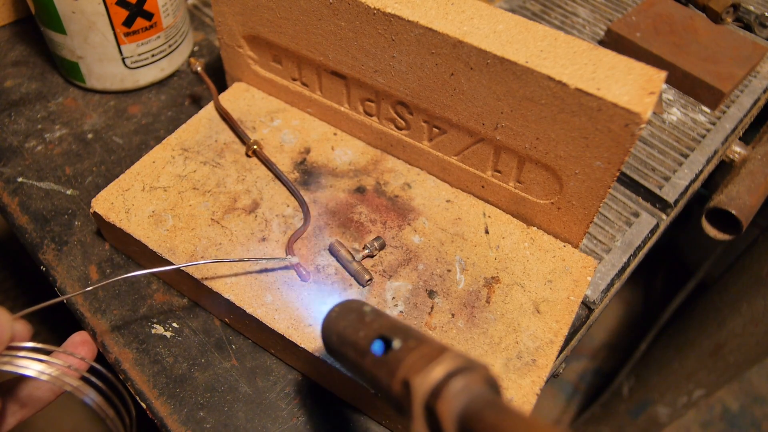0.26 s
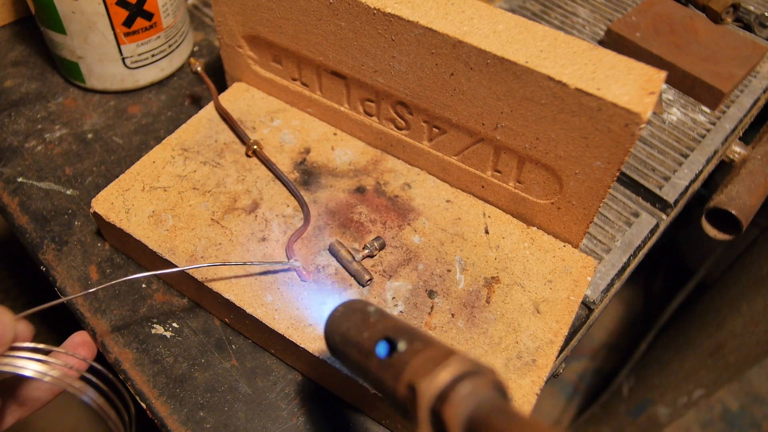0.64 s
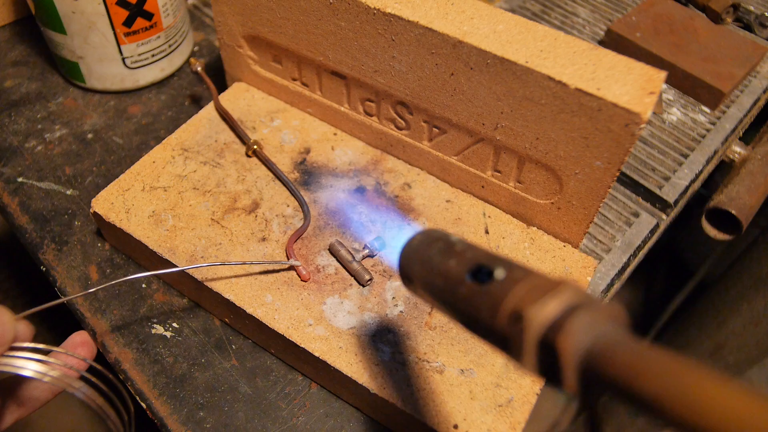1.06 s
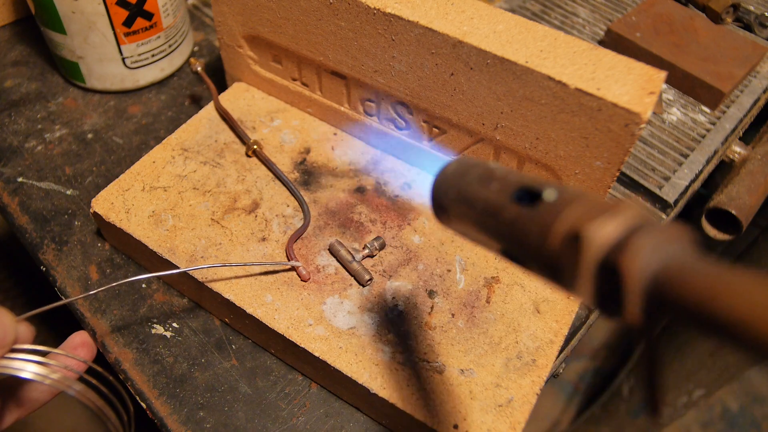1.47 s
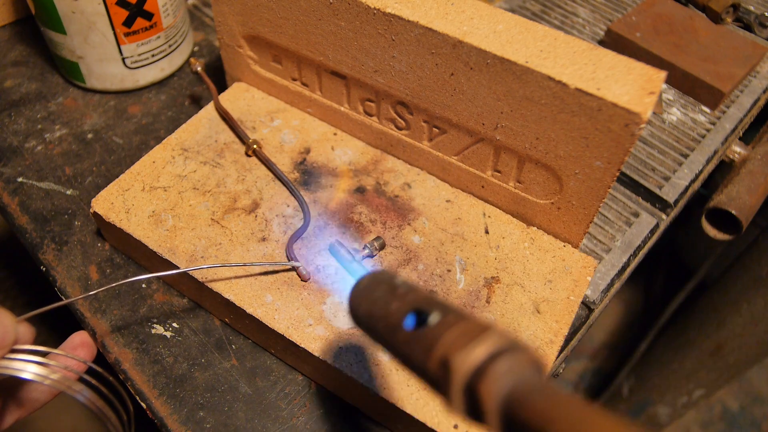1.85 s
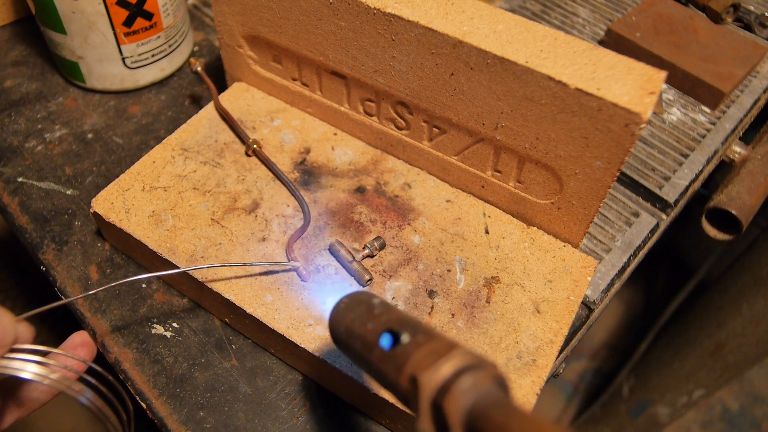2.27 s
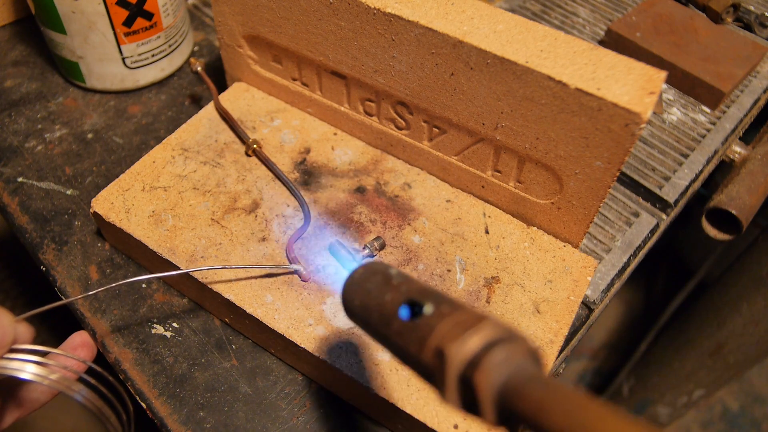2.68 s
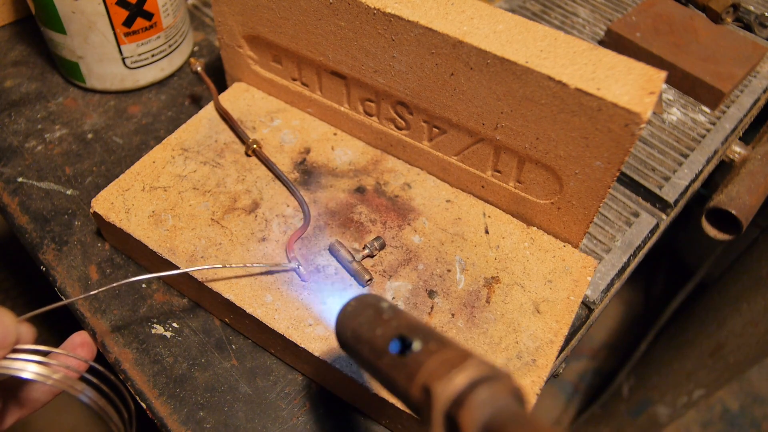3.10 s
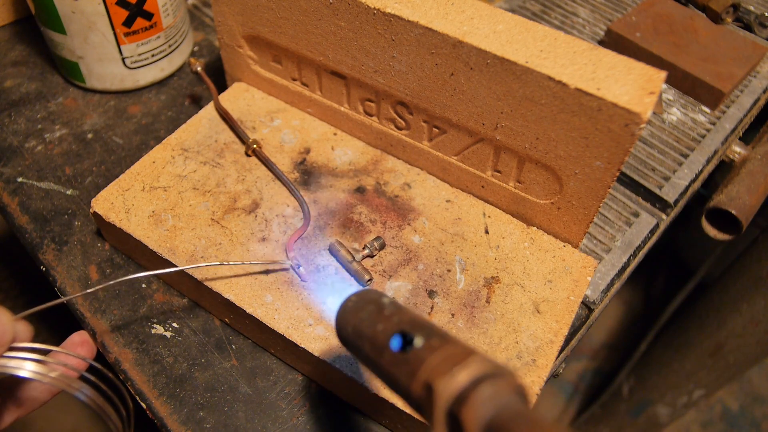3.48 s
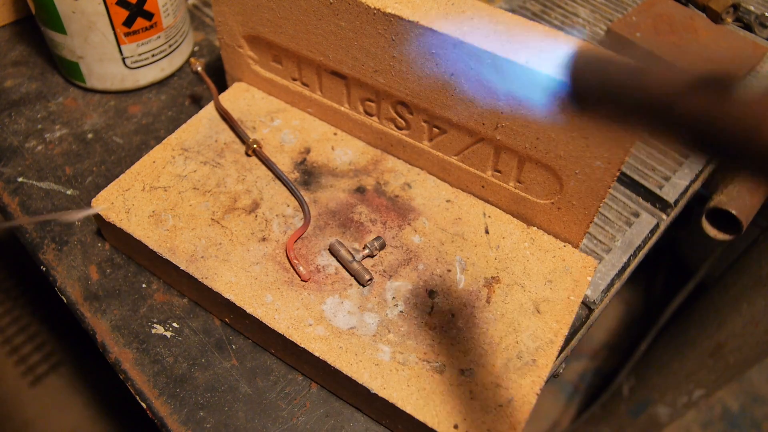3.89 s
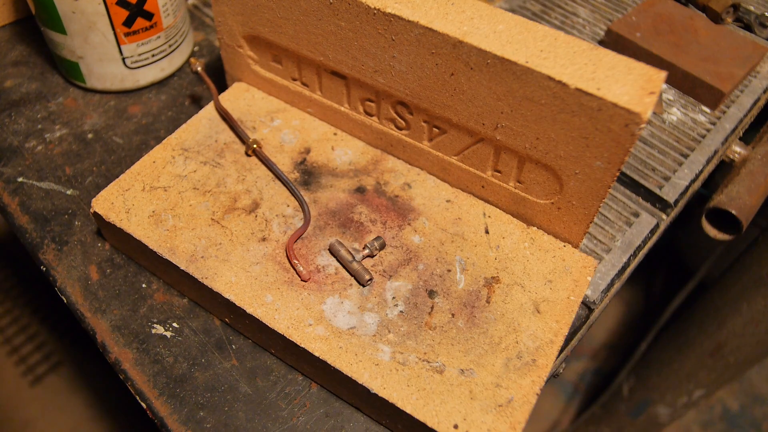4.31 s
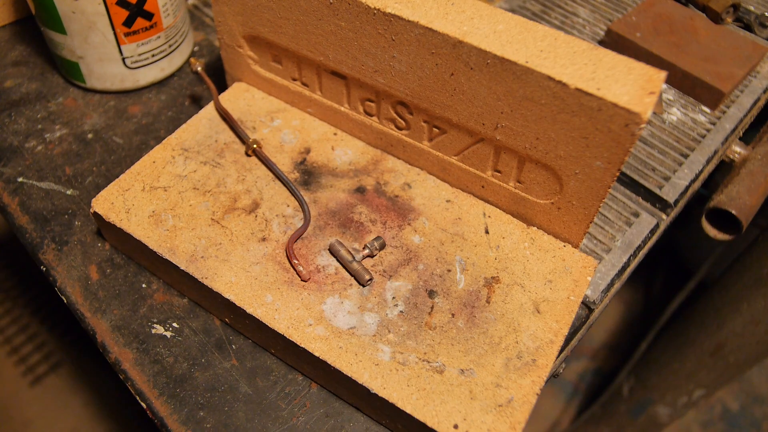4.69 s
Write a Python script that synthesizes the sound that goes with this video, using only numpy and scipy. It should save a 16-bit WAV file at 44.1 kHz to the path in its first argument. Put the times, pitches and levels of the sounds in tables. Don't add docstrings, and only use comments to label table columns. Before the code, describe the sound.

Steady, breathy gas-torch roar near the microphone, fluttering and sweeping in colour with each lift, then sinking to a faint hiss in a quiet workshop.

```python
import sys
import numpy as np
from scipy import signal
from scipy.io import wavfile
from scipy.ndimage import uniform_filter1d, map_coordinates

SR = 44100
rng = np.random.default_rng(int(sys.argv[2]) if len(sys.argv) > 2 else 0)


def output_pcm(signal):
    pcm = np.clip(np.atleast_2d(signal).T, -1, 1) * 32767
    wavfile.write(sys.argv[1], SR, np.round(pcm).astype(np.int16))


def nominal_scale(level):
    x = np.asarray(level, float) / 20
    return 10 ** x


N = 213836
FRAME = 1024

# time_s, lift_ms, sway_ms
TORCH_PATH = [(0.0, 0.0046, -0.0015), (0.4, -0.057, 0.0079), (0.78, -0.032, 0.0074), (0.99, 0.058, -0.0099),
              (1.21, 0.1, -0.016), (1.45, 0.22, 0.004), (1.69, 0.25, 0.011), (1.81, 0.21, -0.014),
              (1.94, 0.03, 0.0094), (2.15, -0.02, -0.0076), (2.6, -0.021, -0.0049), (2.7, 0.022, 0.0014),
              (2.9, 0.055, 0.0021), (3.0, -0.002, 0.00077), (3.65, -0.0089, 0.0067), (3.8, 0.12, -0.0093),
              (3.97, 0.33, -0.024), (4.85, 0.74, 0.005)]
# time_s, share_gone (0-1)
LEAVING = [
    (3.72, 0.01),
    (4.01, 0.97),
]
CARRIED_S = 4.061


def along(points, hz):
    point_hz, value = np.transpose(points)
    return np.interp(np.log(hz + 1), np.log(point_hz + 1), value)


def curves(rows, t):
    time_s, *columns = np.transpose(rows)
    return [np.interp(t, time_s, column) for column in columns]


def wobble(rate_hz):
    knots = rng.standard_normal(int(N * rate_hz / SR) + 4)
    return map_coordinates(knots, [np.arange(N) * rate_hz / SR])


def shaped(x, response):
    hz, t, spectrum = signal.stft(x, SR, nperseg=FRAME, noverlap=FRAME * 3 // 4)
    gain = response(hz[:, None], t) * np.ones(spectrum.shape)
    gain /= np.sqrt(np.mean(np.abs(gain) ** 2, axis=0))
    return signal.istft(spectrum * gain, SR, nperseg=FRAME, noverlap=FRAME * 3 // 4)[1][:N]


def shop():
    # freq_hz, density_db
    room_db = [(88, -30), (150, 0), (554, -11), (701, 3), (1720, -27), (1950, -16), (2500, -17),
               (3250, -53), (5500, -120)]
    tone = shaped(rng.standard_normal(N), lambda hz, t: nominal_scale(along(room_db, hz)))
    return nominal_scale(-65) * tone


def walls(x, count, first_ms, last_ms, fall_db):
    at = np.arange(N)
    lift = curves(TORCH_PATH, at / SR)[0] * SR / 1000
    place, share, size = rng.random((count, 3)).T
    lag = (first_ms + (last_ms - first_ms) * place) * SR / 1000
    size = (2 * size - 1) * nominal_scale(-fall_db * place)
    echoes = 0
    for gain, delay, lift_share in zip(size, lag, share):
        moving_delay = delay + 3 * (2 * lift_share - 1) * lift
        echoes = echoes + gain * np.interp(at - moving_delay, at, x)
    return echoes / np.linalg.norm(size)


def jet(flicker):
    # time_s, level_db
    hiss_db = [
        (0, -81),
        (1, -81),
        (2, -80),
        (3, -81),
        (4.05, -80),
        (4.25, -79),
        (4.4, -75),
        (4.6, -78),
        (4.85, -78),
    ]
    # freq_hz, density_db
    colour_db = [(2000, -24), (5000, -18), (8000, -14), (11400, -10.5), (12200, -6), (12900, -13),
                 (15600, -24)]

    def colour(hz, t):
        return nominal_scale(along(colour_db, hz) - 60 * (hz < 1500))

    hiss = shaped(flicker ** 0.54 * rng.standard_normal(N), colour)
    return nominal_scale(curves(hiss_db, np.arange(N) / SR)[0]) * hiss


def echo(hz, ms, gain, loss_db):
    return gain * nominal_scale(loss_db * hz / 10000) * np.exp(-2j * np.pi * hz * ms / 1000)


def paths(hz, t):
    # delay_ms, lift_share, sway_share, gain, loss_db_per_10khz
    brick_echoes = [(0.138, 0.44, 1, -0.083, 1.5), (0.234, 1.026, 0.8, 0.11, -12.06),
                    (0.356, 0.91, 0.5, -0.17, -5.5), (0.357, 0.055, 2.3, 0.078, 3),
                    (0.424, 0.11, 1.6, 0.17, 2.5), (0.473, 1.452, 2.394, 0.043, -10.772),
                    (0.531, 0.93, -1.2, -0.51, -14), (0.674, 0.91, 0.3, -0.39, -13.5),
                    (0.843, 0.99, 1, 0.081, 5), (1.037, 0.978, -2.5, 0.1, -4),
                    (1.046, 0.2, -0.141, -0.38, -17), (1.167, 0.75, -4, 0.17, -18.929),
                    (1.85, 0.77, -0.5, -0.58, -71)]
    # time_s, lasting_s, delay_ms, gain, loss_db_per_10khz
    dwelt_spots = [
        (0.425, 0.56, 1.91, 0.063, 0.3),
        (0.483, 0.35, 1.683, 0.12, -14),
        (0.522, 0.33, 0.263, 0.14, 5),
        (1.555, 0.502, 1.83, -0.12, -11),
        (1.831, 1.65, 1.416, -0.081, -5),
        (2.687, 0.15, 0.357, 0.18, 0.7),
        (2.754, 0.27, 0.325, -0.22, -4),
        (2.843, 2.3, 0.14, 0.1, -1),
        (3.322, 0.48, 0.9, -0.057, -4.0),
    ]
    # time_s, lasting_s, delay_ms, growth_ms_per_s, gain
    passed_surfaces = [(1.202, 0.46, 0.396, 0.38, -0.13), (3.92, 0.32, 0.434, 0.099, 0.11),
                       (3.961, 0.275, 0.162, 0.56, 0.11), (4.005, 0.18, 0.853, 0.81, -0.25),
                       (4.032, 0.12, 0.71, 1.7, 0.14), (4.039, 0.303, 0.21, 0.19, -0.121),
                       (4.089, 0.13, 0.578, 0.026, 0.249), (4.149, 0.24, 0.86, 0.457, -0.0044),
                       (4.197, 0.31, 1.386, 0.376, 0.24), (4.23, 0.112, 1.25, -0.34, -0.11),
                       (4.268, 0.77, 1.68, -0.066, 0.091), (4.294, 0.23, 0.785, 0.4, -0.43),
                       (4.357, 0.33, 0.71, -0.09, 1), (4.644, 0.62, 0.363, 0.0074, -0.24)]
    soft_db = -100
    lift_ms, sway_ms = curves(TORCH_PATH, t)
    near = 1 - curves(LEAVING, t)[0]

    def close(time_s, lasting_s):
        return np.exp(-((t - time_s) / lasting_s) ** 2)

    brick = dwelt = passed = 0
    for ms, up, aside, gain, loss_db in brick_echoes:
        brick = brick + echo(hz, ms + up * lift_ms + aside * sway_ms, gain * near, loss_db)
    for time_s, lasting_s, ms, gain, loss_db in dwelt_spots:
        dwelt = dwelt + echo(hz, ms, gain * close(time_s, lasting_s), loss_db)
    for time_s, lasting_s, ms, growth, gain in passed_surfaces:
        moving_ms = ms + growth * (t - time_s)
        passed = passed + echo(hz, moving_ms, gain * close(time_s, lasting_s), soft_db * ms * gain ** 2)
    return 1 + 1.1 * brick + 1.3 * (dwelt + passed)


def patches(shape, depth_db):
    field = rng.standard_normal(shape)
    field = uniform_filter1d(field, size=40, axis=0)
    field = uniform_filter1d(field, size=4, axis=1)
    return nominal_scale(depth_db * field / field.std())


def falters(t):
    # time_s, dip_db, rebound_db
    chokes = [(0.16, 0.5, 0.2), (0.43, 1.5, 1), (1.05, 2.5, -1.5), (1.25, 1, -0.7), (1.48, 1, -1),
              (1.75, 2.5, 0.5), (2.39, 1.5, 1), (3.01, 0.5, -1.5), (3.94, 0.5, -1), (4.62, 4.5, 3.5),
              (4.81, 3, 4)]
    choke_s, catch_s = 0.027, 0.046

    def bump(time_s):
        return np.exp(-((t - time_s) / choke_s) ** 2)

    return sum(up_db * bump(time_s + catch_s) - dip_db * bump(time_s) for time_s, dip_db, up_db in chokes)


def brightness(t):
    on_brick_db, lift_db_per_ms, dull_db_per_s = -0.34, 3, 3.5
    left_dull = 0.74
    choke_dull = 0.089
    lifted_db = lift_db_per_ms * curves(TORCH_PATH, t)[0] * (1 - left_dull * curves(LEAVING, t)[0])
    carried_db = dull_db_per_s * np.clip(t - CARRIED_S, 0, None)
    return on_brick_db + lifted_db + choke_dull * falters(t) - carried_db


def strength(t):
    flame_db, swell_db = -41.5, 0.5
    fade_db_per_s, fade_s = 20.5, 0.56
    fade_db = fade_db_per_s * np.clip(t - CARRIED_S, 0, fade_s)
    return flame_db + swell_db * wobble(5.125) + falters(t) - fade_db


def flame():
    # time_s, slow_db, fast_db
    flicker_depth = [
        (0, 0.4, 1.22),
        (4.1, 0.34, 1.02),
        (4.85, 1.3, 1.1),
    ]
    # freq_hz, density_db
    roar_db = [(125.0, -12.5), (180.0, -3), (330.0, 0), (550.0, -3), (800.0, 1.5), (1100.0, -10),
               (1600.0, -5.5), (2400.0, -5.5), (4000.0, -13), (5500.0, -17.5), (7500.0, -37), (9500.0, -33),
               (12000.0, -43), (14600.0, -47)]
    # freq_hz, width_hz, lift_db
    resonances = [(257, 17, 0.5), (329, 32, 0.5), (624, 15, 2), (926, 120, 4.5), (1294, 99, 5.5),
                  (1950, 51, 3.5), (2396, 330, 3.5), (3080, 76, 4), (2950, 120, 1), (3865, 113, 6),
                  (4150, 270, 6), (4930, 270, 3.5), (5140, 70, -2.5), (6220, 590, 5.5), (7080, 940, 6),
                  (8320, 270, 5.5), (8700, 350, 3.5), (9450, 760, 5), (12151, 152, 4), (13900, 500, 0)]
    t = np.arange(N) / SR
    slow_db, fast_db = curves(flicker_depth, t)
    surge_db = slow_db * wobble(55) + fast_db * wobble(110) + 1.3 * wobble(500)
    swell_db = uniform_filter1d(surge_db, size=SR // 16)
    flicker = nominal_scale(surge_db - swell_db)
    burning = flicker * rng.standard_normal(N) / np.sqrt(np.mean(flicker ** 2))

    def colour(hz, t):
        tilt_db = brightness(t) * np.log2((hz + 1) / 1000)
        below_db = -14 * np.clip(np.log2(125 / (hz + 1)), 0, 4)
        above_db = -6 * np.clip(np.log2((hz + 1) / 14600), 0, 4)
        body_db = sum(lift_db / (1 + (2 * (hz - centre_hz) / width_hz) ** 2)
                      for centre_hz, width_hz, lift_db in resonances)
        level = nominal_scale(along(roar_db, hz) + tilt_db + below_db + above_db + body_db)
        return level * paths(hz, t) * patches((len(hz), len(t)), depth_db=0.68)

    return nominal_scale(strength(t)) * shaped(burning, colour), flicker


def scene():
    roar, flicker = flame()
    scatter = walls(roar, count=40, first_ms=2.5, last_ms=40, fall_db=14.5)
    scatter = signal.sosfilt(signal.butter(1, 700, "high", fs=SR, output="sos"), scatter)
    return (roar + nominal_scale(-8.5) * scatter + jet(flicker) + shop())[None]


def low_pass(x):
    return signal.sosfilt(signal.butter(12, 15620, fs=SR, output="sos"), x)


def record(dry):
    whine_hz = [3978, 4643, 5539]
    dry = signal.sosfilt(signal.butter(3, 120, "high", fs=SR, output="sos"), dry)
    rumble = signal.lfilter([0.01], [1, -0.99], rng.standard_normal(dry.shape))
    dry = dry + nominal_scale(-74) * rumble
    for hz in whine_hz:
        dry = signal.lfilter(*signal.iirnotch(hz, hz / 45, SR), dry)
    return low_pass(dry - 0.0003)


dry = scene()
out = record(dry)
output_pcm(out)
```